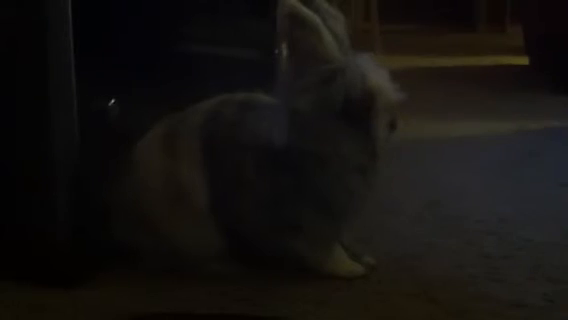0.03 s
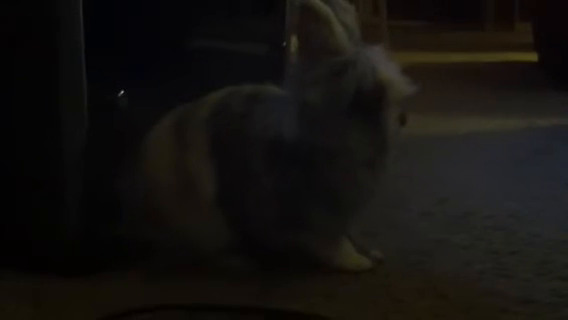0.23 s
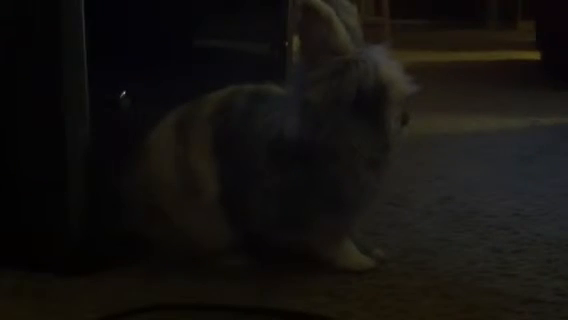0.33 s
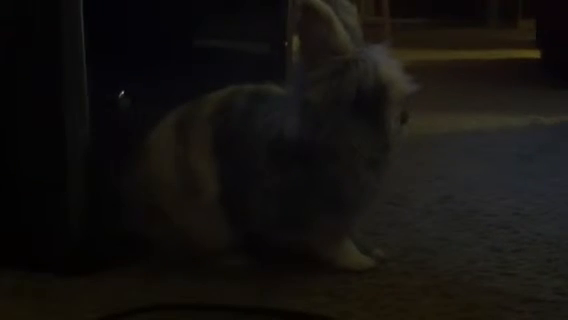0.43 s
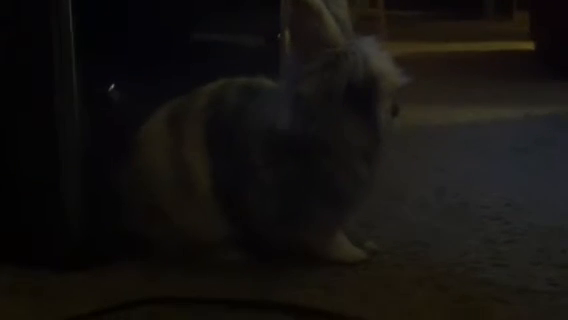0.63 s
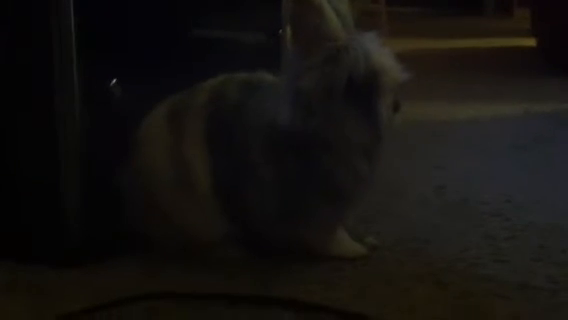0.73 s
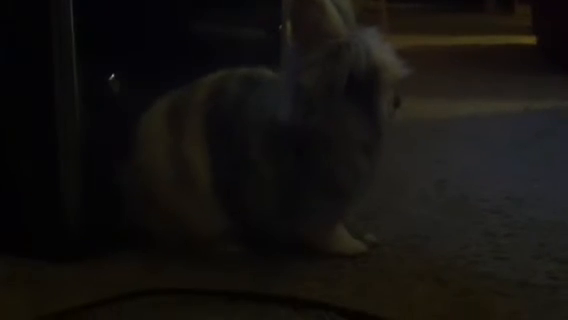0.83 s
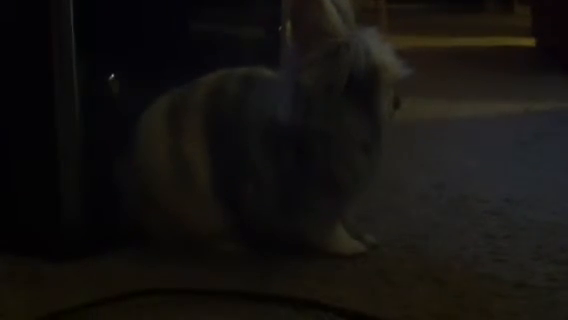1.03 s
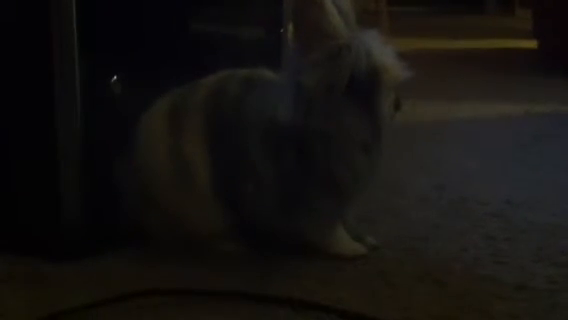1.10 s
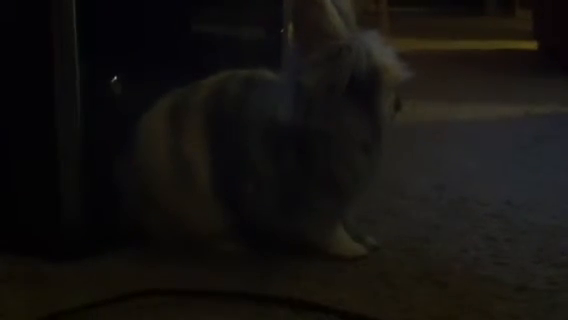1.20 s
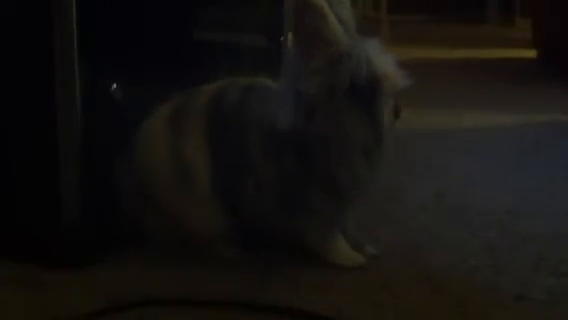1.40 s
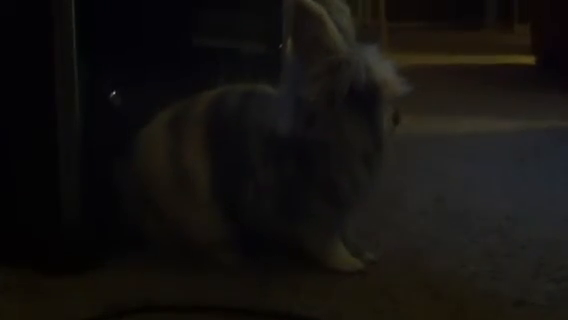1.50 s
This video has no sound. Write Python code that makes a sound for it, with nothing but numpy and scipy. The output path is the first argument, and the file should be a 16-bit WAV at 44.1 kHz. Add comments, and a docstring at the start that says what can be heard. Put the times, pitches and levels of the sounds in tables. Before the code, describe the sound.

A rabbit stamps its hind foot once on a carpeted floor, a short low thump that dies quickly. The quiet room carries on with a faint throbbing appliance hum and soft hiss, and a tiny squeak near the end.

```python
"""A rabbit stamps a hind foot once on a carpeted floor in a quiet room.
The padded blow rings a few heavily damped floor modes, fur scuffs the pile, and the room answers dully.
An appliance hums over soft hiss, its motor lines beating into a fast throb.
Something squeaks faintly near the end."""
import sys
import numpy as np
from scipy import signal
from scipy.fft import rfft, irfft
from scipy.io import wavfile
from scipy.ndimage import uniform_filter1d

SR = 44100
rng = np.random.default_rng(int(sys.argv[2]) if len(sys.argv) > 2 else 0)


def master_out(mix):
    """Clip the mix to full scale and print it as 16-bit PCM to the path in sys.argv[1]."""
    frames = np.transpose(np.atleast_2d(mix))
    ceiling = np.clip(frames, -1, 1)
    pcm = np.round(ceiling * 32767).astype(np.int16)
    wavfile.write(sys.argv[1], SR, pcm)


N = 68355

# Stamp, then foot settling: (time [s], peak [dB], push half-width [s])
FOOT_BLOWS = [(.2318, -14, 0.0011), (0.2941, -40, .0021)]
# Upper floor modes: (frequency [Hz], gain re thud [dB], T60 [s])
FLOOR_MODES = [(196, -19, 0.052), (550, -25, 0.087), (1176, -3, 0.015), (1450, 2, 0.0053),
               (2270, -16, .008)]


def stamp(t, floor_hz=158.4, floor_q=3.46):
    """Each sudden stop of the foot rings the floor; little radiates below its main resonance."""
    omega = 2 * np.pi * floor_hz
    floor = signal.bilinear([1, 0, 0], [1, omega / floor_q, omega ** 2], SR)
    blows = np.zeros(N)
    for at_s, peak_db, push_s in FOOT_BLOWS:
        u = (t - at_s) / push_s
        acceleration = (3 * u ** 2 - 1) / (1 + u ** 2) ** 3
        thud = signal.lfilter(*floor, acceleration)
        blow = thud + sum(undb(db) * ring(thud, hz, t60_s) for hz, db, t60_s in FLOOR_MODES)
        blows += undb(peak_db) * blow / np.abs(blow).max()
    return blows


# Brush, then slap: (time [s], level [dB], rise [s], fall [s])
FUR_CONTACTS = [(.2297, -39.5, 0.00056, 0.0064), (.2318, -31, 0.00019, 0.0003)]
# Friction spectrum: (frequency [Hz], relative density [dB])
FUR_SPECTRUM = [(900, 17), (1700, 5.5), (2250, 3), (3000, -4), (3700, -6.5), (4450, 3), (5500, -9.5),
                (8400, -8.5), (15000, -26)]


def fur_scuff(t):
    """Fur brushes the pile, then slaps flat: two noise bursts."""
    envelope = sum(undb(db) * np.exp(np.minimum((t - at_s) / rise_s, (at_s - t) / fall_s))
                   for at_s, db, rise_s, fall_s in FUR_CONTACTS)
    return envelope * noise(FUR_SPECTRUM)


# Wall reflections: (delay [s], gain [dB], low-pass [Hz])
WALL_RETURNS = [(0.0219, -25.5, 1500), (.068, -30, 605)]


def room(x, t, tail_db=-17, t60_s=0.35, build_s=0.0065, highpass_hz=205):
    """Two dull wall returns and a short diffuse tail with little bass."""
    returns = sum(undb(db) * cut(np.interp(t - delay_s, t, x, left=0), hz, "low")
                  for delay_s, db, hz in WALL_RETURNS)
    envelope = (1 - np.exp(-t / build_s)) * np.exp(-np.log(1000) * t / t60_s)
    response = rng.standard_normal(N) * envelope
    tail = signal.fftconvolve(x, response / np.linalg.norm(response))[:N]
    return returns + undb(tail_db) * cut(tail, highpass_hz, "high")


# Motor hum: (frequency [Hz], rms [dB])
MOTOR_LINES = [(120, -83), (185.9, -60.5), (213, -63.5), (240.1, -54.5), (267.2, -53), (321.4, -66),
               (348.5, -81.5), (403, -84)]
# Casing resonances: (frequency [Hz], width [Hz], rms [dB])
CASING_MODES = [(185.5, 38.5, -60), (249.2, 85, -61), (680, 133, -71)]


def appliance(t, in_phase_s=0.779, waver_rad=0.1, waver_hz=5.1):
    """Motor lines about 27 Hz apart beat into a throb; moving air stirs the casing."""
    hum = sum(level(np.cos(2 * np.pi * hz * (t - in_phase_s) + waver_rad * drift(waver_hz)), db)
              for hz, db in MOTOR_LINES)
    rumble = sum(level(resonate(rng.standard_normal(N), hz, width_hz), db)
                 for hz, width_hz, db in CASING_MODES)
    return hum + rumble


# Faint squeaks: (time [s], pitch [Hz], rms at centre [dB], Gaussian sigma [s])
SQUEAKS = [(1.423, 2060, -70.5, 0.0068), (1.451, 2090, -68.5, 0.0073)]


def squeaks(t, waver_rad=0.25, waver_hz=150):
    """Brief, slightly unsteady high tones."""
    tones = np.zeros(N)
    for at_s, hz, db, sigma_s in SQUEAKS:
        tone = np.sin(2 * np.pi * hz * t + waver_rad * drift(waver_hz))
        tones += level(tone, db) * np.exp(-0.5 * ((t - at_s) / sigma_s) ** 2)
    return tones


# Room air spectrum: (frequency [Hz], relative density [dB])
AIR_SPECTRUM = [(25, -11.5), (70, -14.5), (140, -2.5), (300, 0.5), (600, -0.5), (1100, -4.5), (1700, -10.5),
                (3000, -15.5), (4500, -16), (8000, -21.5), (10000, -27.5), (15000, -32)]


def room_air(rms_db=-65):
    """Steady soft hiss."""
    return undb(rms_db) * noise(AIR_SPECTRUM)


def undb(db):
    """Decibels to gain."""
    return 10 ** (np.asarray(db) / 20)


def level(x, rms_db):
    """Scale to an rms level."""
    return x * undb(rms_db) / np.sqrt(np.mean(x ** 2))


def noise(points):
    """Unit-rms noise coloured by (Hz, dB) points."""
    hz, db = np.array(points, float).T
    bins_hz = np.maximum(np.arange(N // 2 + 1) * SR / N, 1)
    gain = undb(np.interp(np.log(bins_hz), np.log(hz), db))
    return level(irfft(rfft(rng.standard_normal(N)) * gain, N), 0)


def drift(rate_hz):
    """Smooth random drift, unit rms."""
    hold = int(SR / rate_hz)
    steps = np.repeat(rng.standard_normal(N // hold + 2), hold)
    return level(uniform_filter1d(uniform_filter1d(steps, hold), hold)[:N], 0)


def cut(x, hz, kind):
    """Second-order Butterworth low-pass or high-pass."""
    return signal.sosfilt(signal.butter(2, hz, kind, fs=SR, output="sos"), x)


def ring(x, hz, t60_s):
    """One damped mode, gain 1 at its centre."""
    q = np.pi * hz * t60_s / np.log(1000)
    return signal.lfilter(*signal.iirpeak(hz, q, fs=SR), x)


def resonate(x, hz, width_hz):
    """A resonance applied twice, for steep skirts."""
    b, a = signal.iirpeak(hz, hz / width_hz, fs=SR)
    return signal.lfilter(b, a, signal.lfilter(b, a, x))


def scene():
    """The stamp in its room, over hum, squeaks and hiss; mono."""
    t = np.arange(N) / SR
    foot = stamp(t) + fur_scuff(t)
    return (foot + room(foot, t) + appliance(t) + squeaks(t) + room_air())[None]


def record(dry):
    """Steep elliptic low-pass at 15.7 kHz."""
    return signal.sosfilt(signal.ellip(10, 0.1, 70, 15700, fs=SR, output="sos"), dry)


dry = scene()
out = record(dry)
master_out(out)
```